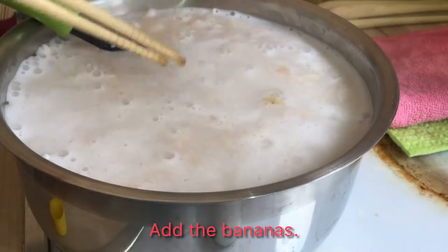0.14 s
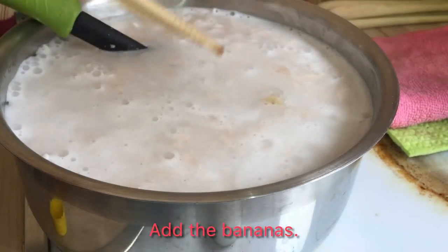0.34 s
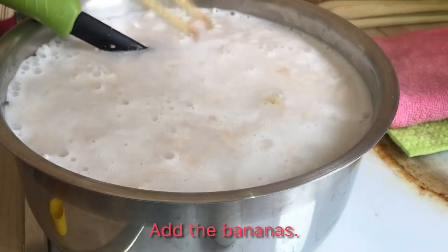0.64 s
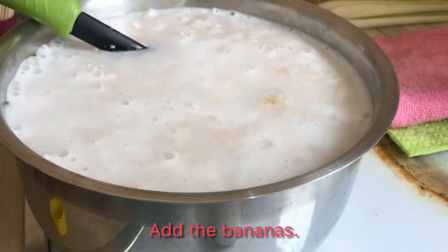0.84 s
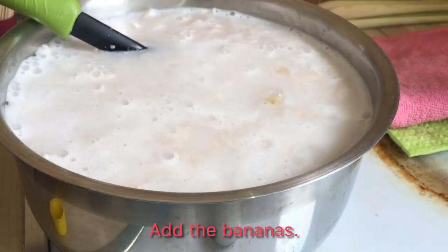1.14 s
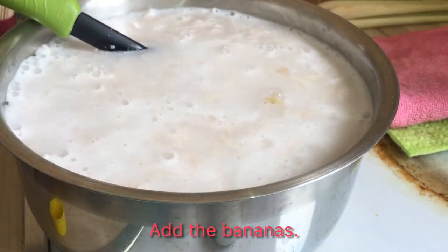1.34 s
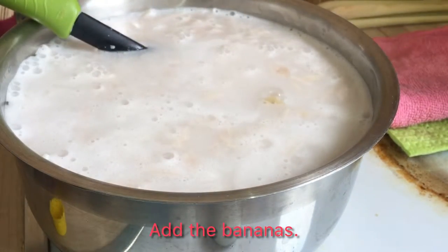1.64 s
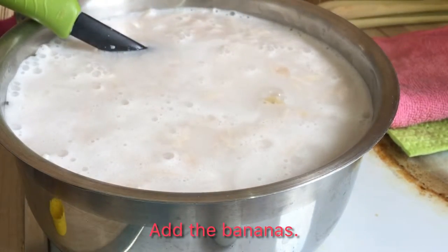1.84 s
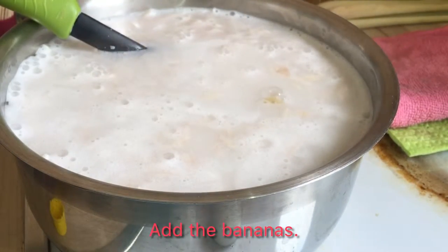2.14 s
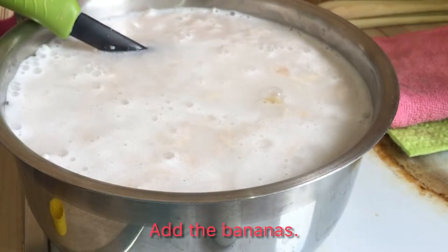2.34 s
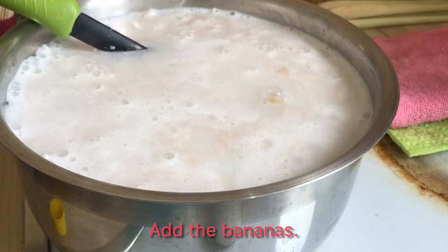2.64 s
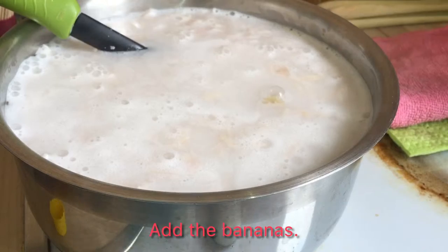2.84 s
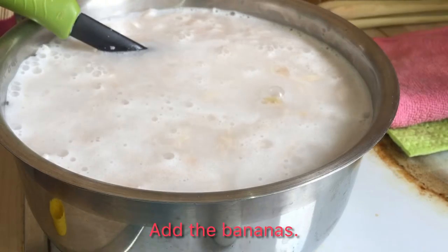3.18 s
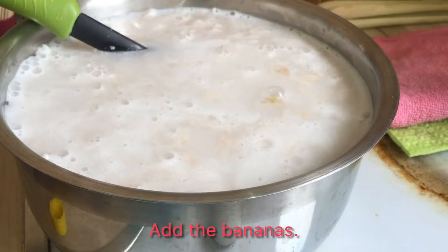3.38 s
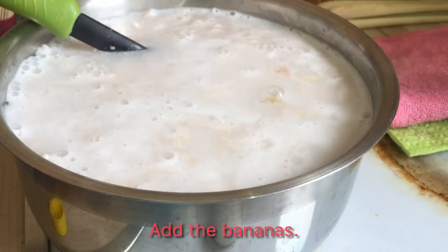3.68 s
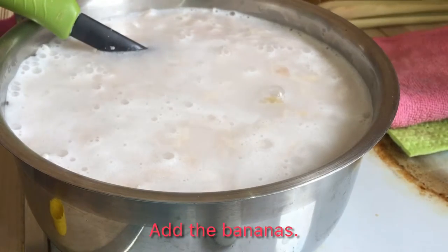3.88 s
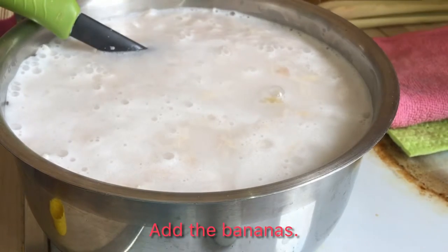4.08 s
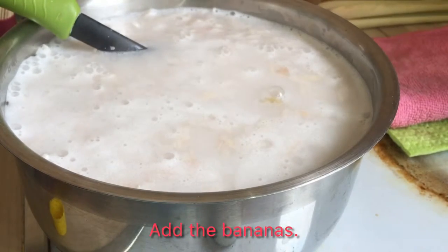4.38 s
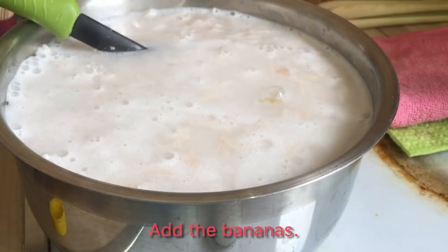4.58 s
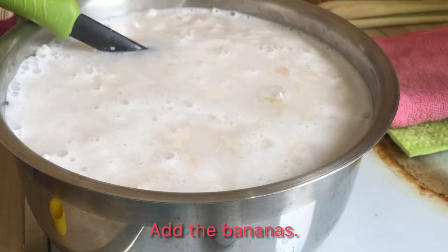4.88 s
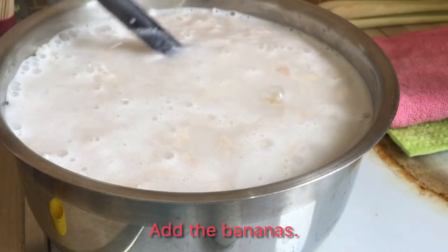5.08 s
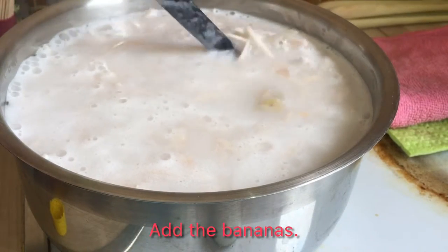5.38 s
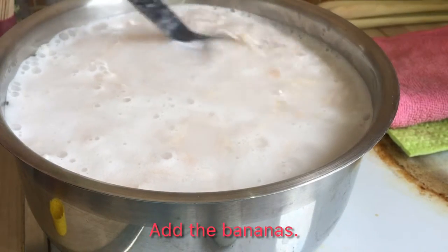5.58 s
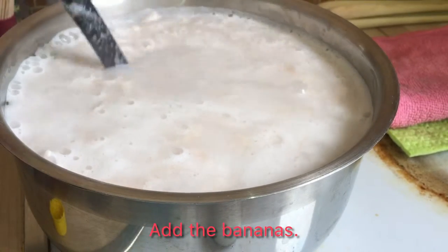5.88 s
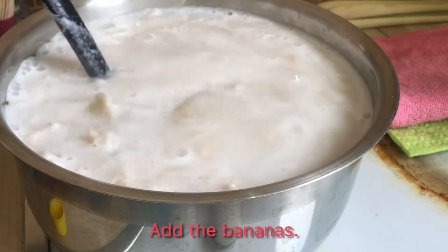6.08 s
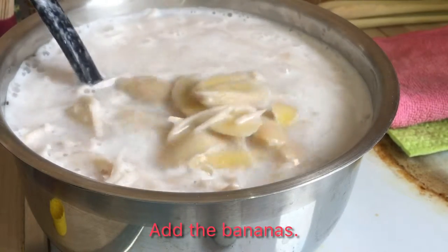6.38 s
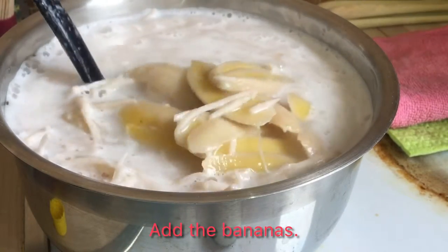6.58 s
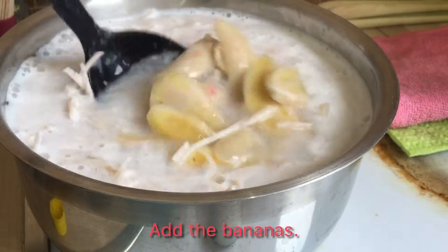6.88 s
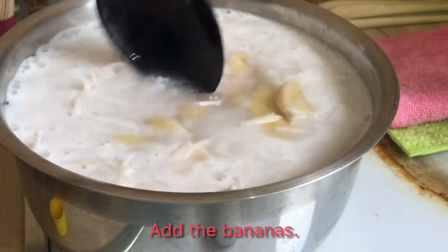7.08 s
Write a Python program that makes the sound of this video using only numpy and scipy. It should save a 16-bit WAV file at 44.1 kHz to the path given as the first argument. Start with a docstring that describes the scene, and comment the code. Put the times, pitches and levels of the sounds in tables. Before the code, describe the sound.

Close single-channel pickup in a small hard kitchen with a low, steady stove rumble and hiss. Wooden chopsticks tick lightly on a ceramic bowl and rub softly, rap twice, then clink it in a rapid bright cluster around two seconds. After a pause the dish lands on the counter with one loud knock and two duller ones. Tiny foam pops follow, then a ladle swishes very quietly through thick milk, ending in small wet plops.

```python
"""At a kitchen stove, one channel: steady rumble, murmur, hiss and hum from shaped noise and sines.
Chopsticks tick, rub and rap on a ceramic bowl, then clink it: noise snaps over decaying bowl modes.
Foam pops now and then; the dish lands on the counter in three dull knocks, and a last faint clink follows.
Then a ladle swishes through thick milk and ends in two small wet plops, made of fluttering and resonant noise.
A small hard kitchen answers the contacts with a short decaying noise tail."""
import sys
import numpy as np
from scipy import signal
from scipy.fft import rfft, irfft, next_fast_len
from scipy.io import wavfile
from scipy.ndimage import map_coordinates

SR = 44100
rng = np.random.default_rng(int(sys.argv[2]) if len(sys.argv) > 2 else 0)


def put_to_file(sound):
    """Save the sound as 16-bit audio at rate SR, in the file named by the first command-line argument."""
    columns = np.atleast_2d(sound).T  # one column per channel
    safe = np.clip(columns, -1, 1)
    whole_steps = np.round(safe * 32767)
    wavfile.write(sys.argv[1], SR, whole_steps.astype(np.int16))


N = 318402
T = np.arange(SR // 2) / SR  # clock of one contact, half a second

# spectrum of the sticks' wooden knock: hz, level_db
WOOD = [(200, -42), (600, -9), (950, 11.5), (1300, -8), (1600, -16), (2000, -4), (3000, -14), (3900, -10),
        (6000, -57)]
# ring of the dish's rim: mode_hz, level_db, t60_s
RIM = [(6525, 0, .25), (9300, -11, .13)]


def amp(db):
    """Decibels to gain."""
    return 10 ** (np.asarray(db) / 20)


def unit(x):
    """Scaled to rms 1."""
    return x / np.sqrt(np.mean(x ** 2) + 1e-20)


def blow(x):
    """Scaled to rms 1 over its first 10 ms."""
    return x / np.sqrt(np.mean(x[:SR // 100] ** 2) + 1e-20)


def along(points, hz):
    """Reads (Hz, value) points on a log frequency axis."""
    point_hz, values = np.transpose(points)
    return np.interp(np.log(hz + 1), np.log(point_hz), values)


def wobble(rate):
    """A smooth random curve through normal draws, rate knots a second."""
    knots = rng.standard_normal(int(N * rate / SR) + 4)
    return map_coordinates(knots, [np.arange(N) * rate / SR])


def filtered(x, response):
    """x times a zero-phase response of frequency."""
    m = next_fast_len(len(x) + 8192)
    return irfft(rfft(x, m) * response(np.fft.rfftfreq(m, 1 / SR)), m)[:len(x)]


def coloured(x, points):
    """x through the causal minimum-phase filter with the given (Hz, dB) shape."""
    m = 2 * len(T)
    shape = amp(along(points, np.fft.rfftfreq(m, 1 / SR)))
    cepstrum = irfft(np.log(shape), m)
    # folding the cepstrum forward puts the whole response after the blow
    cepstrum[1:m // 2] *= 2
    cepstrum[m // 2 + 1:] = 0
    return irfft(rfft(x, m) * np.exp(rfft(cepstrum)), m)[:len(x)]


def fade(t60):
    """Falls 60 dB in t60 seconds."""
    return np.exp(-np.log(1000) * T / t60)


def burst(points, t60):
    """A dying puff of coloured noise."""
    puff = rng.standard_normal(len(T)) * fade(t60)
    return blow(coloured(puff, points))


def ping(hz, q, t60):
    """A dying puff of noise passed twice through one resonance of sharpness q."""
    b, a = signal.iirpeak(min(hz, SR * .4), max(q, 1), fs=SR)
    puff = rng.standard_normal(len(T)) * fade(t60)
    once = signal.lfilter(b, a, puff)
    return blow(signal.lfilter(b, a, once))


def ring(modes):
    """Damped modes, each with a slightly new strength and a new phase every time."""
    draws = rng.standard_normal((len(modes), 2))
    total = 0
    for (hz, db, t60), (vary_db, phase) in zip(modes, draws):
        total = total + amp(db + vary_db) * fade(t60) * np.sin(2 * np.pi * hz * T + np.pi * phase)
    return total


def add(track, s, x):
    """Mix x into the track at s seconds."""
    start = max(round(s * SR), 0)
    track[start:start + len(x)] += x[:N - start]


def in_kitchen(x, wet_db):
    """A contact plus the answer of nearby walls and cupboards: noise that decays at its own rate per pitch."""
    # reverberation: hz, t60_s
    reverb = [(100, 0.22), (300, 0.4), (1000, 0.22), (4000, 0.28), (10000, 0.22)]
    hz, t, z = signal.stft(rng.standard_normal(len(T)), SR, nperseg=256)
    decay = np.exp(-np.log(1000) * t / along(reverb, hz)[:, None])
    tail = signal.istft(z * decay, SR, nperseg=256)[1][:len(T)]
    tail = tail * (1 - np.exp(-T / 0.00063))  # the answer builds up just after the contact
    tail = tail / np.linalg.norm(tail)
    return x + amp(wet_db) * signal.fftconvolve(x, tail)[:len(T)]


def clinks():
    """Place on the rim weights the bowl's modes, hardness tilts them, and a resting stick shortens the ring."""
    # touches: start_s, strength_db, tilt_db_per_octave, place_deg, share of free ring time, wood_knock_db
    touches = [(.399, -62.5, 4.5, 53, .3, -84), (1.9929, -37, 5, 74, 0.69, -53.5),
               (2.0126, -24, 3, 50, 0.87, -45), (2.047, -38, -4, 28, 0.63, -48),
               (2.071, -30, -6, 50, .6, -46.5), (2.0856, -34, 1, 18.4, .7, -44.5),
               (2.102, -42.5, 3.5, 75, 0.64, -43.5), (2.297, -45.5, -2, 16.7, 0.25, -63),
               (2.376, -50, -4, 60, 0.53, -54), (2.415, -53.5, 0.5, 50, 0.18, -61),
               (2.612, -50.5, -5.5, 53, 0.31, -58.5), (2.6938, -48, -3.5, 49, 0.27, -57.5),
               (4.8424, -61, 1, 77, 0.91, -74)]
    # bowl modes with 2, 3, .. waves round the rim: mode_hz, level_db, free t60_s
    bowl_modes = [(1180, -7, 0.38), (2809, -9.5, 0.49), (4887, -4.5, 0.25), (7290, -10, 0.23),
                  (10045, -3.5, 0.082)]
    # the sticks' own ring: mode_hz, level_db re the wood knock, t60_s
    stick_modes = [(3740, -10.5, 0.13), (3950, -17, 0.1), (4840, -8, 0.11), (5570, -13.5, 0.16),
                   (9000, -17, .2), (9700, -15, 0.13)]
    # spectrum of the sticks' click: hz, level_db
    click_shape = [(500, -7), (1800, 8), (3000, -13.5), (3900, -2.5), (5500, 4.5), (7800, -7), (9500, 9),
                   (11000, -23), (12500, -7.5)]
    pivot_hz = 3000  # the tilt leaves this frequency as it is
    node_leak = .25  # what is left of a mode when the stick lands on its node
    click_db, chatter_db = -12.5, -6  # click re the tilted strength, chatter re each mode
    touch_damp_db = -3  # the next touch takes this off the ring

    out = np.zeros(N)
    mode_hz, mode_db, mode_t60 = np.transpose(bowl_modes)
    waves = 2 + np.arange(len(bowl_modes))
    next_touch = [row[0] for row in touches[1:]] + [N / SR]
    for (s, db, tilt, place, free, knock_db), until in zip(touches, next_touch):
        place_db = 10 * np.log10(np.cos(waves * np.radians(place)) ** 2 + node_leak ** 2)
        ring_db = db + mode_db + place_db + tilt * np.log2(mode_hz / pivot_hz)
        modes = list(zip(mode_hz, ring_db, mode_t60 * np.clip(free, .1, 1)))
        damped = amp(touch_damp_db * np.clip((T - (until - s)) / .003, 0, 1))
        ringing = (ring(modes) + amp(knock_db) * ring(stick_modes)) * damped
        # the chattering contact smears each mode into a short band of noise
        smear = sum(amp(level + chatter_db) * ping(hz, q=18, t60=0.027) for hz, level, _ in modes)
        wood = amp(knock_db) * burst(WOOD, t60=0.017)
        # one octave of tilt: the click lies about an octave above the pivot
        click = amp(db + tilt + click_db) * burst(click_shape, t60=0.019)
        add(out, s, in_kitchen(ringing, wet_db=-11.0) + in_kitchen(wood + click + smear, wet_db=-3))
    return out


def ticks():
    """A stick tip snaps against something hard and rings briefly in two bending modes."""
    # light taps: start_s, level_db, pitch_hz, ring_db re the snap, lower_ring_db re the snap
    taps = [(.3606, -68, 7200, 1.5, -17), (.841, -48, 7720, -1, -21), (1.0006, -56, 7900, -2, -13),
            (1.2173, -64.5, 5560, 2.5, -5), (1.4185, -65.5, 6740, 4, -8), (2.299, -48.5, 9040, 7.5, -1.5),
            (2.8422, -70.5, 6570, -4, -16)]
    # spectrum of the snap: hz, level_db
    snap_shape = [(500, -73), (2500, -9), (4000, -8), (5500, -3), (7000, 4), (9500, 10), (11000, 5),
                  (12500, -20)]
    out = np.zeros(N)
    for s, db, hz, ring_db, lower_db in taps:
        upper = amp(ring_db) * ping(hz, q=9.1, t60=0.023)
        lower = amp(lower_db) * ping(hz * 0.6, q=3.4, t60=0.024)
        snap = burst(snap_shape, t60=0.035)
        add(out, s, amp(db) * (in_kitchen(snap, wet_db=-4) + in_kitchen(upper + lower, wet_db=-4.0)))
    return out


def raps():
    """Firmer taps on the rim: the wood knocks and snaps, and the rim sings faintly."""
    # raps: start_s, wood_knock_db, snap_db, rim_ring_db
    rim_taps = [(1.533, -51, -53.5, -62), (1.642, -52.5, -45.5, -57)]
    # spectrum of the snap: hz, level_db
    snap_shape = [(500, -37), (1500, -4), (3000, -7), (5000, 2), (6000, 0), (6700, 12), (7800, -2.5),
                  (9400, 6), (11000, 3), (12500, -27)]
    out = np.zeros(N)
    for s, knock_db, snap_db, rim_db in rim_taps:
        wood = amp(knock_db) * burst(WOOD, t60=0.012)
        snap = amp(snap_db) * burst(snap_shape, t60=0.015)
        add(out, s, in_kitchen(wood + snap, wet_db=-0.5) + amp(rim_db) * ring(RIM))
    return out


def knocks():
    """The dish lands, rocks and settles: longer contacts swell slower, lower brightness dulls push and boom."""
    # landings: start_s, level_db, thump_db, crack_db, rim_ring_db, contact_s, brightness_hz
    landings = [(4.3292, -24, -44, -49, -50.5, 0.008, 1330), (4.523, -40, -51, -69, -84, 0.053, 730),
                (4.676, -29, -41, -50, -79, 0.046, 1290)]
    # spectra of the push, the low thump and the crack: hz, level_db
    push_shape = [(60, -16), (110, -8.5), (200, -1), (300, -3), (430, -14.5), (600, 2), (770, 3.5),
                  (950, -0.5), (1130, 3.5), (1400, -8.5), (1800, -12), (3000, -2), (5000, -35)]
    thump_shape = [(50, -21), (110, -6), (200, -5), (300, -4.5), (420, -6), (1500, -77)]
    crack_shape = [(500, -26), (1800, 10.5), (2600, -1), (4000, -2.5), (8000, -4), (12000, -21)]
    # counter modes: mode_hz, level_db, t60_s
    counter_modes = [(118, -7, .3), (296, -4, .45), (339, -13, .15), (522, -7, .19), (585, -5, .22),
                     (673, -2, .24), (770, -2, .22), (839, -1, .23), (924, -3, .17), (975, -5, .2),
                     (1026, -6, .19), (1115, -.5, .22), (1235, -10, .2), (1416, -19, .25), (1800, -24, .15),
                     (2126, -22, .25)]
    boom_db = -7.5  # the counter's ring re the blow

    out = np.zeros(N)
    for s, db, thump_db, crack_db, rim_db, contact, bright_hz in landings:
        def softness_db(hz):
            return -10 * np.log10(1 + (hz / bright_hz) ** 8)
        soft_push = [(hz, level + softness_db(hz)) for hz, level in push_shape]
        soft_modes = [(hz, level + softness_db(hz), t60) for hz, level, t60 in counter_modes]
        push = amp(db) * burst(soft_push, t60=contact)
        boom = amp(db + boom_db) * ring(soft_modes)
        thump = amp(thump_db) * burst(thump_shape, t60=0.15)
        swell = 1 - np.exp(-T / (0.098 * contact))
        crack = amp(crack_db) * burst(crack_shape, t60=0.035)
        body = in_kitchen((push + thump + crack) * swell, wet_db=-1.5)
        add(out, s, body + boom * swell + amp(rim_db) * ring(RIM))
    return out


def bubbles():
    """Tiny pops of the foam, close to the microphone and so dry: very short broad resonances."""
    # bursting bubbles: start_s, level_db, pitch_hz
    pops = [(1.1703, -57, 10400), (4.1463, -59, 9900), (4.213, -68, 6500), (4.272, -53, 8650),
            (4.769, -66, 8780), (4.965, -61, 9200), (5.0497, -63, 5300), (5.4184, -66, 9980),
            (5.47, -65, 9590)]
    upper_hz = 11300  # upper edge of a pop
    out = np.zeros(N)
    for s, db, hz in pops:
        add(out, s, amp(db) * ping(hz, q=1.36, t60=0.0046))
    return filtered(out, lambda hz: 1 / np.sqrt(1 + (hz / upper_hz) ** 20))


def plops():
    """Small wet smacks as the ladle turns the fruit over: noise through a broad resonance."""
    # smacks: start_s, level_db, pitch_hz
    smacks = [(7.042, -62.5, 1540), (7.1305, -66, 2800)]
    out = np.zeros(N)
    for s, db, hz in smacks:
        add(out, s, amp(db) * in_kitchen(ping(hz, q=1.6, t60=0.049), wet_db=-8))
    return out


def stroke(s, length):
    """The speed of one push of the hand, 0-1: it rises, holds and falls."""
    rise_s, fall_s = 0.073, 0.11
    t = np.arange(N) / SR
    return np.clip(np.minimum((t - s) / rise_s, (s + length - t) / fall_s), 0, 1)


def swish(points, flutter_db):
    """Soft rubbing noise: rms 1 before a quick random flutter of its level."""
    noise = filtered(rng.standard_normal(N), lambda hz: amp(along(points, hz)))
    return amp(flutter_db * wobble(25)) * unit(noise)


def stirring():
    """Thick milk swishes softly round the ladle: fluttering noise follows the speed of each stroke."""
    # ladle strokes: start_s, length_s, level_db
    ladle_strokes = [(5.354, 0.22, -66.5), (5.649, 0.32, -68), (6.15, 0.36, -73), (6.552, 0.68, -67.5)]
    # spectrum of the swish: hz, level_db
    milk_shape = [(150, -31), (300, -0.5), (420, -7.5), (600, -4), (900, -29), (2000, -56)]
    speed = sum(amp(db) * stroke(s, length) for s, length, db in ladle_strokes)
    return speed * swish(milk_shape, flutter_db=3.5)


def sliding():
    """Soft food rubs along the bowl as the sticks push it: fluttering noise under one stroke."""
    # spectrum of the rubbing: hz, density_db (only its shape counts)
    rub_shape = [(100, -4), (300, -1), (600, 2.5), (1000, -7), (1700, -10), (2800, -20), (8000, -26)]
    start_s, length_s, level_db = 0.847, 0.39, -63.5
    return amp(level_db) * stroke(start_s, length_s) * swish(rub_shape, flutter_db=5.0)


def stove():
    """Steady heat: a fluttering rumble, the murmur of the pot, an even hiss and a few wavering hum lines."""
    # noise spectrum: hz, density_db (only its shape within each band counts)
    noise_shape = [(12, -49), (20, 3), (49, -3.5), (93, 0.5), (265, -15), (304, -14.5), (596, -16),
                   (646, -17.5), (823, -18.5), (1020, -24), (1110, -29), (1200, -22.5), (2060, -28.5),
                   (10100, -29), (12500, -48), (16200, -93), (22000, -120)]
    # hum lines: pitch_hz, peak level_db before the wavering
    hum_lines = [(96.9, -63), (146, -70), (317.6, -73), (737.5, -71.5), (834.4, -72.5), (1082, -74),
                 (1130, -75.5), (1233, -81.5), (2164, -83)]
    rumble_db, murmur_db, hiss_db = -61, -64, -69  # rms, before any flutter
    t = np.arange(N) / SR

    def band(lo_hz, hi_hz):
        """Noise of rms 1 between two edges."""
        noise = rng.standard_normal(N)
        return unit(filtered(noise, lambda hz: amp(along(noise_shape, hz)) * (hz > lo_hz) * (hz <= hi_hz)))

    rumble = amp(rumble_db + 2.4 * wobble(16)) * band(22, 220)
    murmur = amp(murmur_db + 0.56 * wobble(9.3)) * band(220, 1810)
    hiss = amp(hiss_db) * band(1800, SR / 2)
    hum = np.zeros(N)
    for hz, db in hum_lines:
        level = amp(db + 0.92 * wobble(4.6))
        hum += level * np.sin(2 * np.pi * hz * t + 1.07 * wobble(12))  # phase wavers, in radians
    return rumble + murmur + hiss + hum


def scene():
    """Everything at the pot, as one channel."""
    contacts = clinks() + ticks() + raps() + knocks()
    pot = bubbles() + plops() + stirring() + sliding()
    return (contacts + pot + stove())[None]


def record(dry):
    """The recorder's steep band limit takes away the highest treble."""
    top_hz = 12300
    return np.array([filtered(x, lambda hz: 1 / np.sqrt(1 + (hz / top_hz) ** 160)) for x in dry])


dry = scene()
out = record(dry)
put_to_file(out)
```